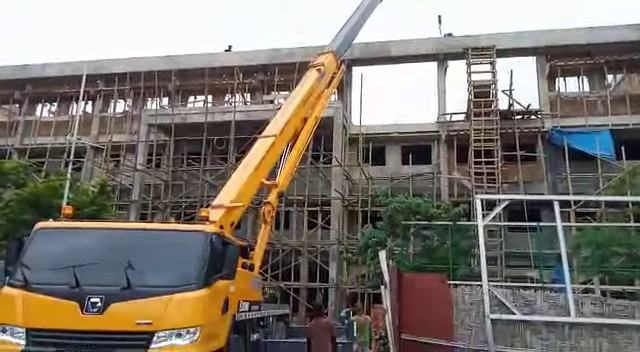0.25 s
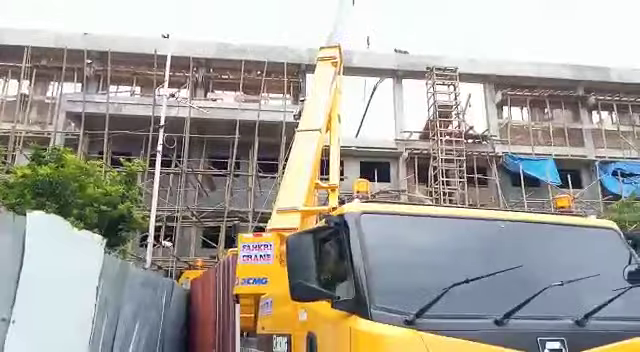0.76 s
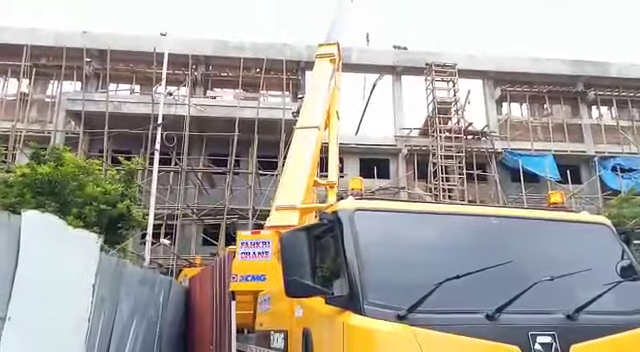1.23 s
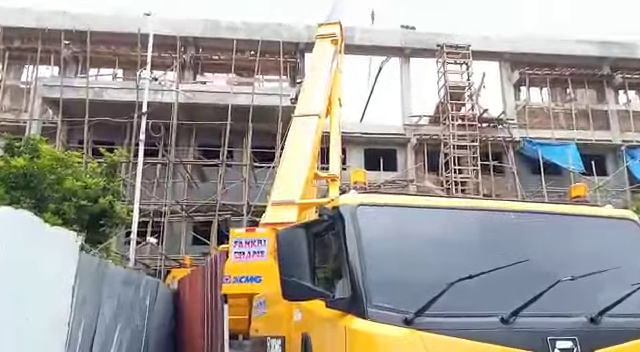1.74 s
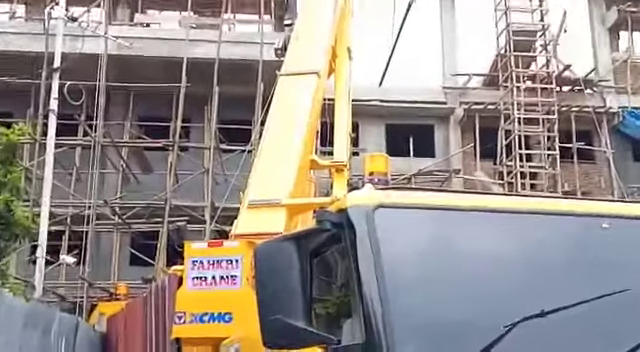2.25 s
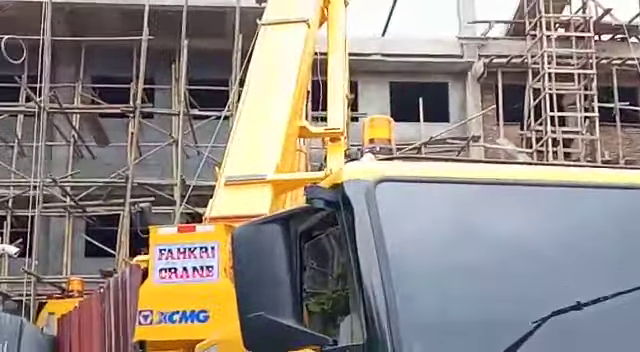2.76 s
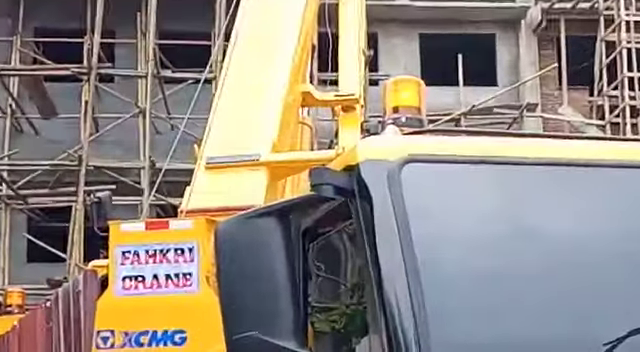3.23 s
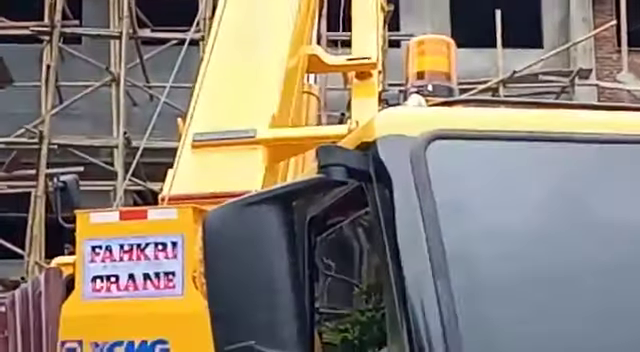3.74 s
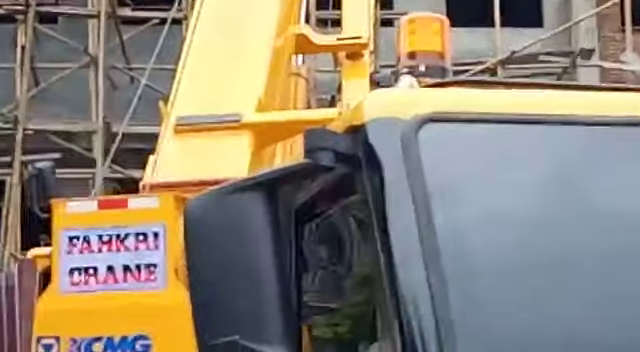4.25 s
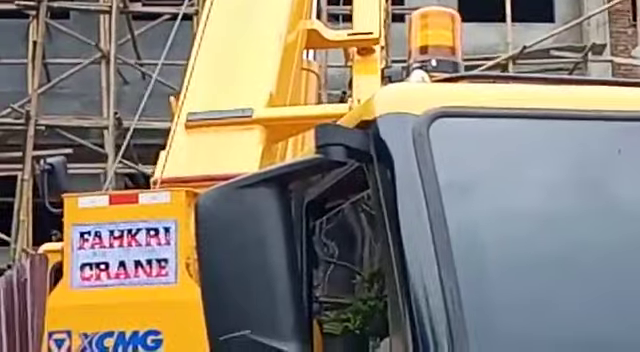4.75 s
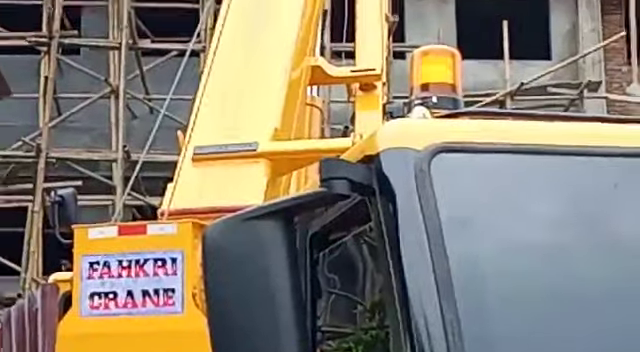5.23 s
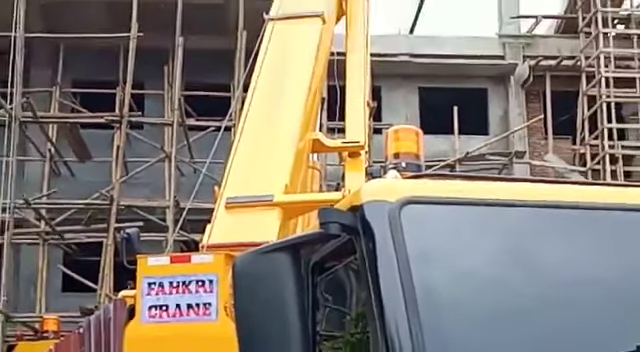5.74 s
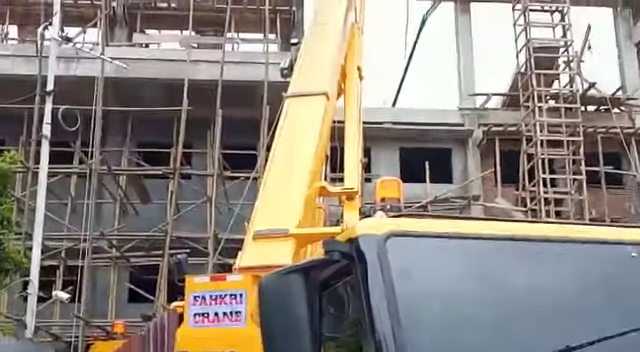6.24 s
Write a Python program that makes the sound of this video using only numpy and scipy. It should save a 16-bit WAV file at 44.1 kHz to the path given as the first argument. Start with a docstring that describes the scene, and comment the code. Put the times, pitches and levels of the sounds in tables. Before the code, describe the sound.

Steady rough diesel idle, fan roar and whining hydraulics of a truck crane outdoors, with one short early gap and a sudden cut closer.

```python
"""Truck crane idling on a building site

A six-cylinder diesel at a steady 800 rpm drives a hydraulic gear pump and a fan.
Heard on a phone from further off, with a short dropout, then after a hard cut from close by the cab.
Knocks are ringing noise bursts repeated every engine cycle, over a roar of noise filtered in octaves.
Pump, gear and a second slower machine are sines on shaft multiples; whistles, hiss and a boom are added."""
import sys
import numpy as np
from scipy import signal
from scipy.fft import rfft, irfft, next_fast_len
from scipy.io import wavfile
from scipy.ndimage import uniform_filter1d

SR = 44100
rng = np.random.default_rng(int(sys.argv[2]) if len(sys.argv) > 2 else 0)


def store_pcm(level_fs):
    """Save levels as 16-bit WAV."""
    pcm = np.round(np.clip(level_fs, -1, 1) * 32767).astype(np.int16)
    wavfile.write(sys.argv[1], SR, np.atleast_2d(pcm).T)


def gain_from_decibels(decibels):
    """Convert decibel values to linear amplitude factors."""
    exponent = np.asarray(decibels, float) / 20
    return 10 ** exponent


N = 286209
T = np.arange(N) / SR
CYCLE_HZ = 6.666  # four-stroke cycle, two crank turns

# engine hood and panel resonances: (centre [Hz], width [Hz], lift [dB])
HOOD_MODES = [(158.5, 10, 4.5), (381, 14, 3.5), (460, 10, 2), (676, 90, 2.5), (806, 50, 0.5),
              (1040, 160, 2.5), (1703, 160, 2.5), (2234, 150, 2.5), (2800, 450, 3), (272, 12, -5.5),
              (445, 22, -3), (3250, 51, -0.5)]


def shape(x, table, modes=()):
    """Filter by (frequency [Hz], gain [dB]) points plus bell-shaped lifts or dips."""
    size = next_fast_len(len(x))
    f = np.maximum(np.arange(size // 2 + 1) * SR / size, 1)
    hz, db = np.transpose(table)
    gain_db = np.interp(np.log(f), np.log(hz), db)
    for centre_hz, width_hz, lift_db in modes:
        gain_db = gain_db + lift_db / (1 + (2 * (f - centre_hz) / width_hz) ** 2)
    return irfft(rfft(x, size) * gain_from_decibels(gain_db), size)[:len(x)]


def noise():
    """White noise at 0 dB per Hz."""
    return rng.standard_normal(N) * np.sqrt(SR / 2)


def walk(rate_hz):
    """Random values held 1 / rate_hz and smoothed twice over that time; spread somewhat below 1."""
    hold = int(SR / rate_hz)
    steps = np.repeat(rng.standard_normal(N // hold + 1), hold)
    return uniform_filter1d(uniform_filter1d(steps, hold), hold)[:N]


def tones(shaft_hz, orders, levels_db, waver_db, wobble_s):
    """Sines on multiples of one shaft whose turning lags and leads a little."""
    turn = 2 * np.pi * shaft_hz * (T + wobble_s * walk(2.976))
    out = np.zeros(N)
    for order, db in zip(orders, levels_db):
        level = np.sqrt(2) * gain_from_decibels(db + waver_db * walk(4))
        out += level * np.sin(order * turn + rng.uniform(0, 2 * np.pi))
    return out


def knock(cylinder_db=3.0, scatter_db=0.5, jitter_s=.00004, t60_s=0.18):
    """Each cylinder shakes the block its own way, alike every cycle, with scatter in size and time."""
    # block knock ahead of hood and microphone: (frequency [Hz], density [dB per Hz])
    block = [(30, -61), (80, -59), (200, -56.5), (450, -62.5), (1000, -64), (2000, -70), (2600, -65.5),
             (3200, -74.5), (4200, -78), (9000, -100)]
    out, ring_s = np.zeros(N), np.arange(SR // 5) / SR
    cycles = np.arange(int(N / SR * CYCLE_HZ) + 1)
    for cylinder in range(6):
        ring = rng.standard_normal(len(ring_s)) * np.exp(-np.log(1000) * ring_s / t60_s)
        jitter, scatter = rng.standard_normal((2, len(cycles)))
        place = ((cycles + cylinder / 6) / CYCLE_HZ + jitter_s * jitter) * SR
        keep = (place >= 0) & (place < N)
        blow_db = cylinder_db * rng.standard_normal() + scatter_db * scatter[keep]
        blows = np.zeros(N)
        blows[place[keep].astype(int)] = gain_from_decibels(blow_db)
        out += signal.fftconvolve(blows, ring)[:N]
    return shape(out / out.std() * np.sqrt(SR / 2), block, HOOD_MODES)


def engine():
    """Block knock plus steady sines on the strong engine orders."""
    # multiples of the cycle, and their levels ahead of the microphone [dB rms]
    orders, levels_db = [6, 8, 12, 13, 18, 22, 28, 39, 60, 70, 100, 120, 141, 153, 160, 162, 166, 168, 178,
                         252, 300, 329, 382, 389, 408, 420], [-61, -55, -43, -45, -44, -41, -45, -42, -49, -41, -45, -46,
                                                -47, -46, -44, -43, -46, -46, -44, -49, -48, -49, -50, -50,
                                                -50, -49]
    return knock() + tones(CYCLE_HZ, orders, levels_db, waver_db=0.5, wobble_s=.00004)


def roar(tilt_db, rumble_db, pulse=0.061, turn_pulse=0.071, flicker_db=0.75, lift_db=0.31):
    """Turbulent fan and exhaust air; treble puffs with the firings, every octave flickers alone."""
    # roar ahead of lift, hood and microphone: (frequency [Hz], density [dB per Hz])
    air = [(30, -61.5), (80, -53), (140, -50.5), (230, -51.5), (300, -51), (450, -59), (800, -56.5),
           (1400, -59), (2400, -61), (3200, -69), (4200, -72), (16000, -75)]
    firing = 1 + pulse * np.cos(2 * np.pi * 6 * CYCLE_HZ * T)
    firing = firing + turn_pulse * np.cos(2 * np.pi * 2 * CYCLE_HZ * T)  # once per crank turn
    firing = firing * gain_from_decibels(0.7 * walk(14))  # load on the pump comes and goes
    out = np.zeros(N)
    for octave in range(9):
        hz = 40 * 2. ** octave
        bell = [(hz / 2, -60), (hz / 2 ** .75, -8.3), (hz / 2 ** .5, -3), (hz, 0),
                (hz * 2 ** .5, -3), (hz * 2 ** .75, -8.3), (hz * 2, -60)]
        high = np.clip(np.log2(hz / 600) / 2, 0, 1)  # 0 in the lows, 1 in the treble
        level_db = high * tilt_db * (.4 if hz > 4000 else 1) + flicker_db * walk(9)
        if hz < 200:
            level_db = level_db + rumble_db
        out += shape(noise(), bell) * firing ** high * gain_from_decibels(level_db)
    return shape(out, air, HOOD_MODES) * gain_from_decibels(lift_db)


def pump():
    """Ten-tooth hydraulic pump: sines on multiples of its shaft."""
    # multiples of the shaft, and their levels close by [dB rms]
    orders, levels_db = [10, 18, 20, 30, 40, 45, 50, 60, 80, 91, 92, 103, 107, 120], [-29.5, -41, -28, -49.5, -51, -52, -46.5, -48.5, -52, -48.5,
                                              -44.5, -51.5, -48, -42.5]
    return tones(17.228, orders, levels_db, waver_db=.7, wobble_s=.00003)


def gear():
    """Twenty-tooth gear: sines on multiples of its shaft."""
    # multiples of the shaft, and their levels [dB rms]
    orders, levels_db = [3, 4, 20, 40, 60, 80], [-43, -44, -49, -44, -46, -49]
    return tones(24.81, orders, levels_db, waver_db=2.5, wobble_s=.00004)


def whistles(tilt_db, shake_hz=45, flutter_db=2.5):
    """Thin tones whose pitch shakes quickly, the high ones probably turbocharger and alternator."""
    # tones ahead of the treble tilt: (pitch [Hz], wander [Hz], level [dB rms])
    pitches = [(465.5, 2.5, -42), (3500, 22, -47.5), (3521, 6, -48.5), (2448, 3, -48), (6551, 8, -74),
               (6655, 8, -75), (7036, 10, -77)]
    out = np.zeros(N)
    for hz, wander_hz, db in pitches:
        turn = 2 * np.pi * np.cumsum(hz + wander_hz * walk(shake_hz)) / SR
        flutter = flutter_db * walk(11 if hz < 1000 else 28)
        out += np.sqrt(2) * gain_from_decibels(db + flutter) * np.sin(turn)
    return out * gain_from_decibels(tilt_db)


def other_machine(rumble_db):
    """Slower machine elsewhere on the site: shaft sines that waver with the lows of the roar."""
    # multiples of the shaft, and their levels ahead of that wavering [dB rms]
    orders, levels_db = [3, 5, 6, 7, 14, 20], [-56, -42, -43, -40, -44, -47]
    return tones(20.49, orders, levels_db, waver_db=1.9, wobble_s=0.00081) * gain_from_decibels(rumble_db)


def hiss(tilt_db, base_db=-78, follow=.9):
    """Noise in the top treble that largely follows the treble tilt."""
    top = [(6000, -30.5), (8500, 4), (10000, 3.5), (11200, 5.5), (12500, 2.5), (14000, 5), (15400, 5.5)]
    return shape(rng.standard_normal(N), top) * gain_from_decibels(base_db + follow * tilt_db)


def boom(pitch_hz=122.5, wander_hz=8, peak_s=.12, rise_s=.03, fall_s=.08, swell_db=-27, bed_db=-38):
    """Low wavering tone between the walls that swells once over a weak bed."""
    turn = 2 * np.pi * np.cumsum(pitch_hz + wander_hz * walk(20)) / SR
    swell = np.exp(-((T - peak_s) / np.where(T < peak_s, rise_s, fall_s)) ** 2)
    return np.sqrt(2) * (gain_from_decibels(bed_db) + gain_from_decibels(swell_db) * swell) * np.sin(turn)


def phone_microphone(x):
    """Uneven response of the phone microphone, applied to the broadband engine and roar."""
    # (frequency [Hz], gain [dB])
    response = [(20, -21.5), (33, -29.5), (45, -11.5), (62, -10), (75, -2.5), (4000, 1), (4500, -10.5),
                (5400, -22.5), (6500, -14.5), (7300, -17.5), (8300, -24.5), (8600, -28.5), (9700, -40),
                (16000, -52)]
    return shape(x, response)


def scene(cut_s=.3982):
    """Sources mixed for a far and a close standpoint, joined by a hard cut."""
    # treble tilt over the running: (time [s], level [dB])
    treble = [(.4, 3), (1.0, 1.5), (2.2, .5), (4.5, -0.5), (5.5, .3), (6.4, 2)]
    # far level relative to close, in the order of sources [dB]
    far_db = [-3, -1.5, -12, 0, 0, -5.5, -9]
    tilt_db = np.interp(T, *np.transpose(treble))
    rumble_db = 0.07 + 0.8 * walk(2.5)  # slow wavering of the lows
    sources = [phone_microphone(roar(tilt_db, rumble_db)), phone_microphone(engine()), pump(), gear(),
               other_machine(rumble_db), whistles(tilt_db), hiss(tilt_db)]
    far = sum(gain_from_decibels(db) * source for db, source in zip(far_db, sources))
    far = np.roll(far, N // 2) + boom()  # another moment of the same running
    close = np.clip((T - cut_s) / .00015 + .5, 0, 1)
    return (far * (1 - close) + sum(sources) * close)[None]


def roll_off(x):
    """The treble ends steeply here."""
    return signal.sosfilt(signal.butter(12, 15500, fs=SR, output="sos"), x)


def record(dry, dropout_start_s=.2463, dropout_end_s=.3578):
    """Sound fades in within 1 ms and drops out once for a tenth of a second."""
    gate = np.clip(np.maximum(dropout_start_s - T, T - dropout_end_s) / 0.0014, 0, 1)
    fade_in = np.clip(T / .001, 0, 1)
    return roll_off(dry * gate * fade_in)


dry = scene()
out = record(dry)
store_pcm(out)
```